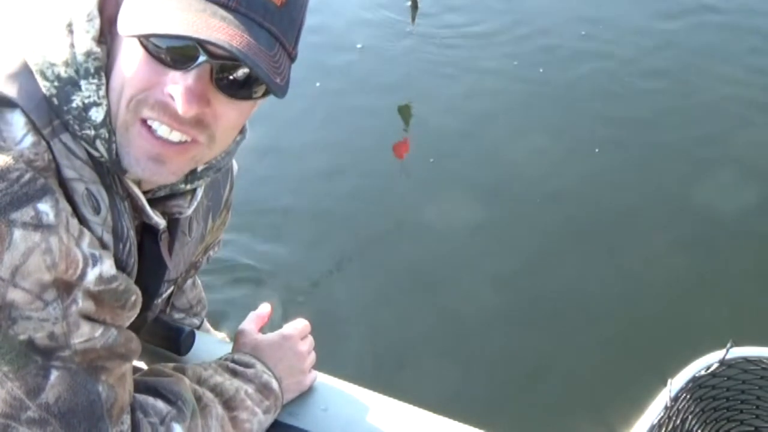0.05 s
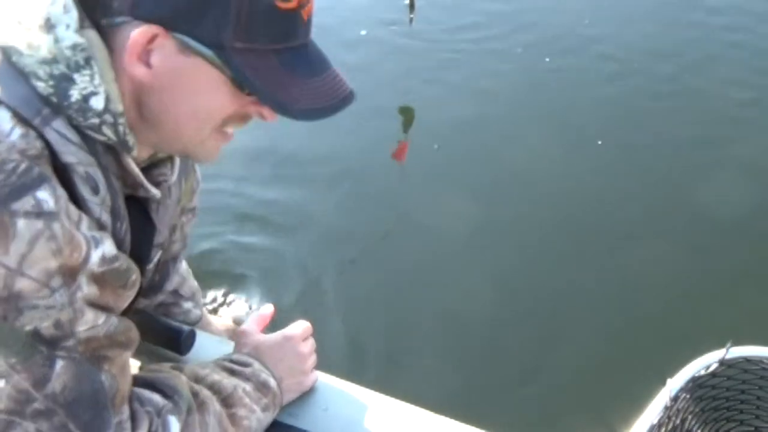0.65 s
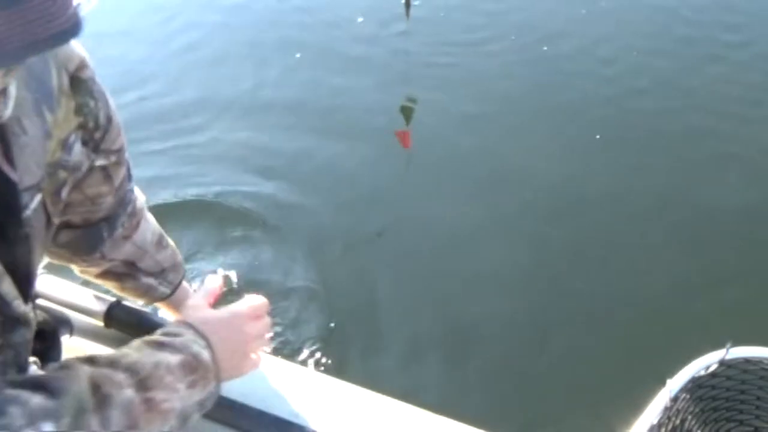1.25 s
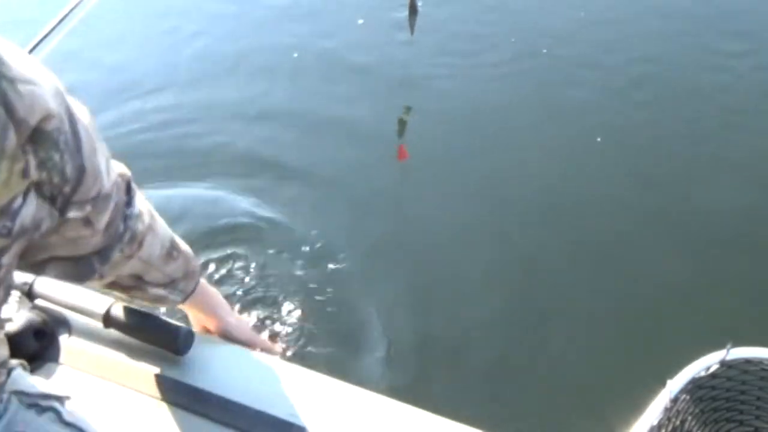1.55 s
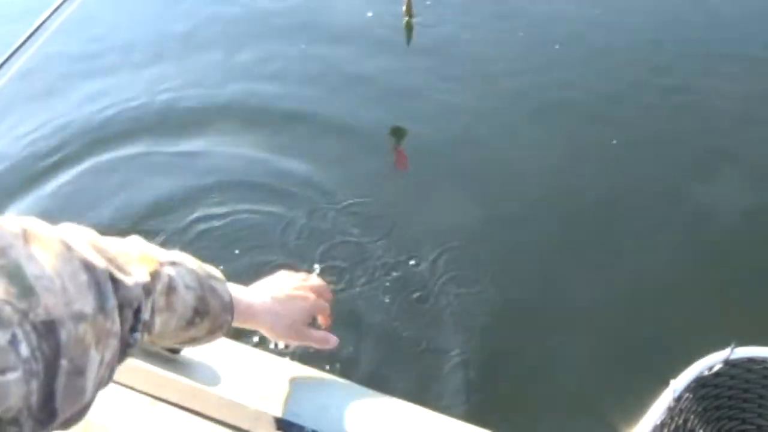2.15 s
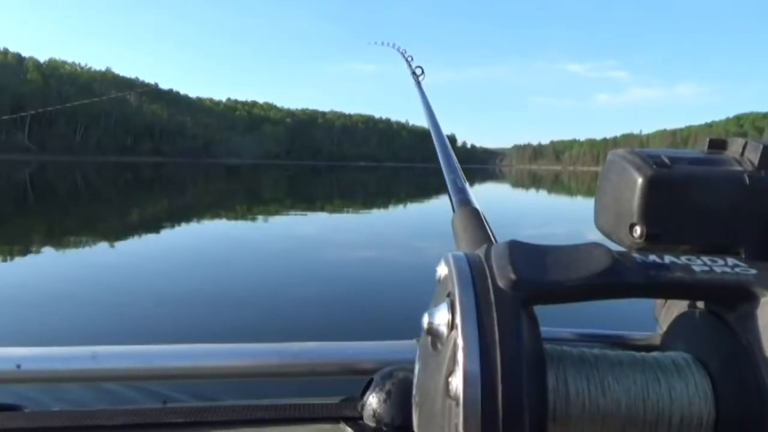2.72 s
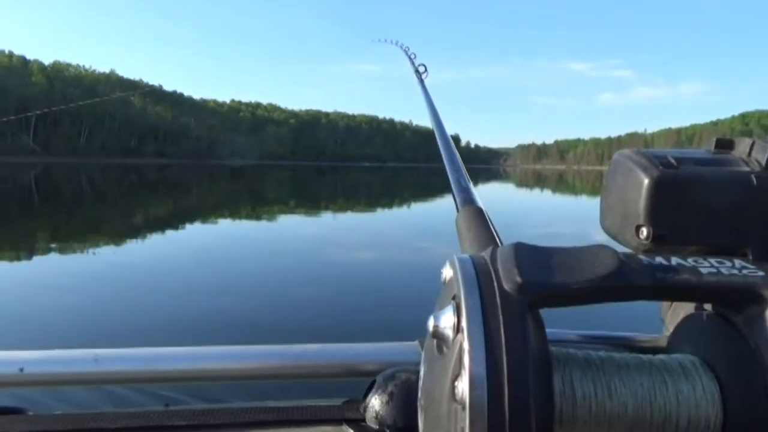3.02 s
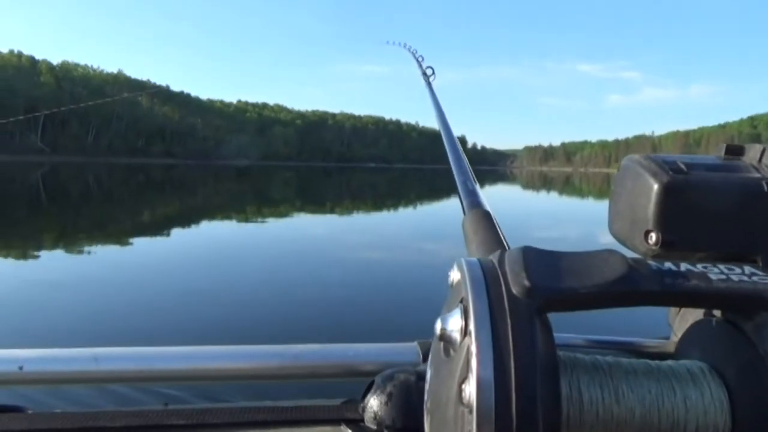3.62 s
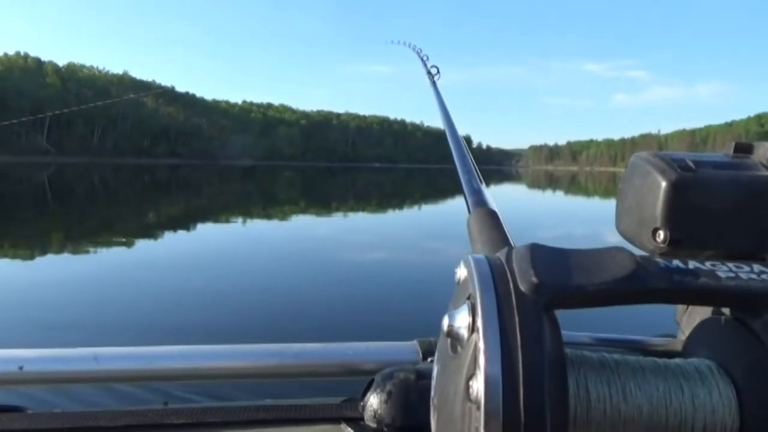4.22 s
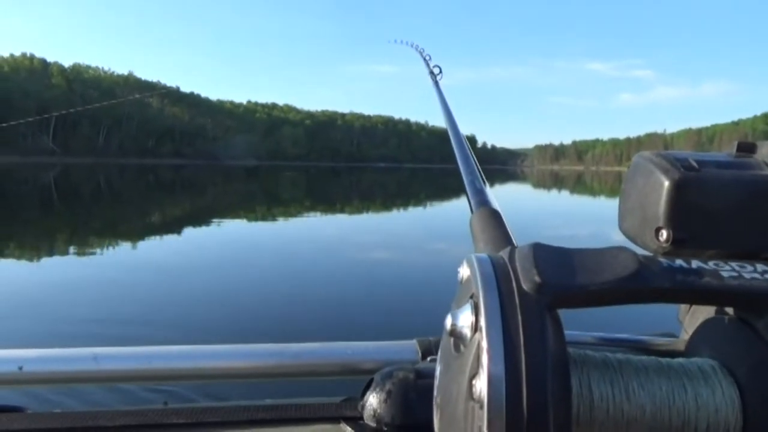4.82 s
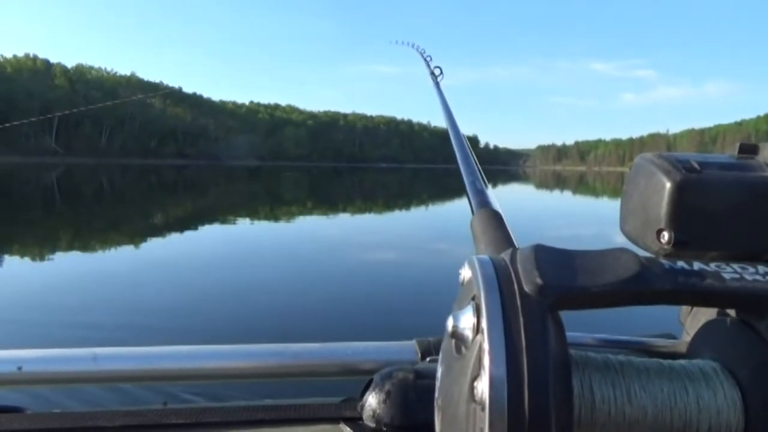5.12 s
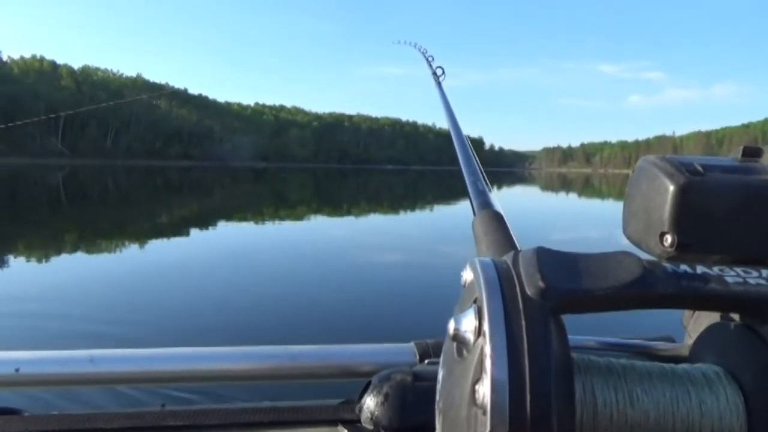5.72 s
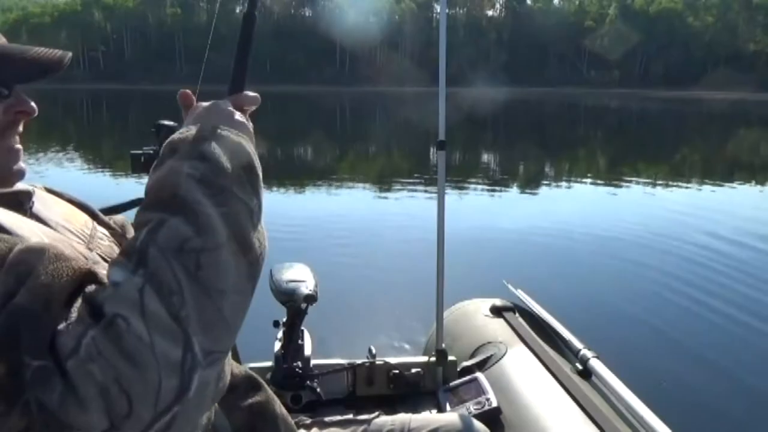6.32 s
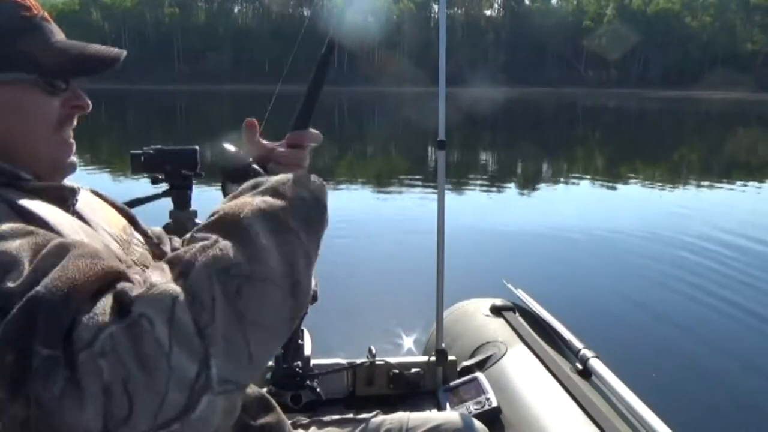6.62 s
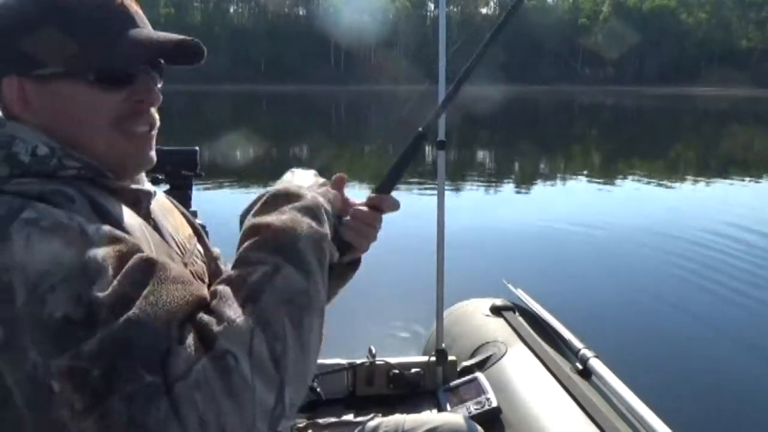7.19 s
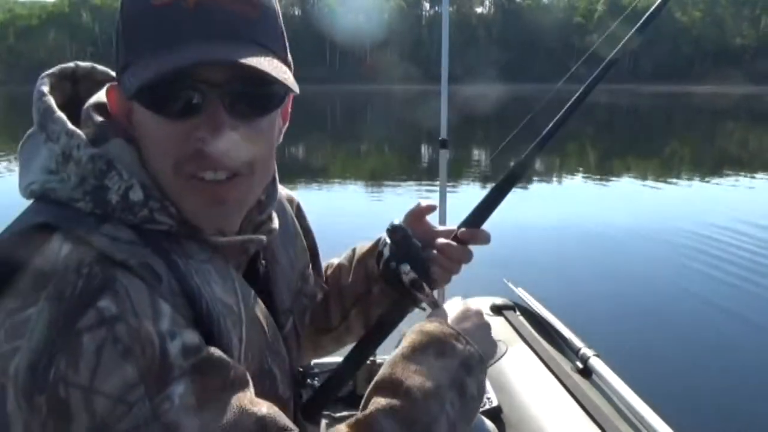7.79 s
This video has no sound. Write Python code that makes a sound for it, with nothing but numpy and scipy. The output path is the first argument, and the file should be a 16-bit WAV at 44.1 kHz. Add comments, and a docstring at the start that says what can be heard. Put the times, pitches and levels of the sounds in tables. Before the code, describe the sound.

On a small boat on a calm lake, a hand plops and splashes in the water, with a rustling jacket and soft bumps on the hull. It turns quiet, leaving a faint trolling motor hum and distant birds. Suddenly a fishing reel's clicker screams right by the microphone, surging as a fish pulls line, then slows to a rattle. Water laps softly under the hull throughout.

```python
"""A fishing reel's clicker, close to the microphone, screams in surges and slows to a rattle as a fish
strips line: a pawl strikes the spool's ratchet teeth and rings the reel. The place is a small boat on a
calm, wooded lake, heard from three spots in turn. At the side, a hand splashes, a jacket rustles and the
hull is bumped. Nearer the trolling motor, its hum lies under distant birds. Last, at the stern, comes
the reel. Water laps under the hull and the open air hisses faintly throughout."""
import sys
import numpy as np
from scipy import signal
from scipy.fft import rfft, irfft, next_fast_len
from scipy.io import wavfile
from scipy.ndimage import map_coordinates

SR = 44100
rng = np.random.default_rng(int(sys.argv[2]) if len(sys.argv) > 2 else 0)


def dump(signal):
    """Clip the signal to [-1, 1] and save it as 16-bit WAV at the path in sys.argv[1]."""
    limited = np.clip(np.atleast_2d(signal).T, -1, 1)
    pcm = np.round(limited * 32767).astype(np.int16)
    wavfile.write(sys.argv[1], SR, pcm)


N = 350595
TIME = np.arange(N) / SR
QUIET_FROM_S, STRIKE_S = 2.392, 6.328   # the stirring ends; the fish takes the line
TEETH_PER_TURN, CRUISE_TEETH_PER_S = 12, 300
SIDE = np.array([[1], [-1]])   # adds on the left, subtracts on the right


# The reel's frame, pawl and spring, close up. Each row: resonance in Hz, width in Hz, relative gain in dB.
FRAME_MODES = [(280, 1270, -16), (1160, 102, -3.5), (1712, 118, 2), (2700, 234, 2.5), (3244, 130, 1),
               (3610, 510, -2)]
PAWL_MODES = [(7000, 780, 22.3), (7600, 360, 9), (5360, 360, 13)]
SPRING_MODES = [(9260, 320, -0.5), (10830, 900, 1), (13750, 580, -1.5), (15100, 820, -9)]

def reel():
    """The clicker, close by: the frame follows the tooth rate cleanly, the small steel parts chatter."""
    teeth_per_s, ring_db = spool()
    teeth_per_s = teeth_per_s * (1 + .015 * drift(60) * teeth_per_s / CRUISE_TEETH_PER_S)
    passed = np.cumsum(teeth_per_s) / SR
    turns = (passed - passed[-1] + .15) / TEETH_PER_TURN   # wheel angle, about zero at the end
    blows = pawl_blows(teeth_per_s, turns) * (TIME >= STRIKE_S)
    on_frame = rattle(blows, teeth_per_s, chatter=.4, chatter_t60=.011, scatter_db=-10, hiss_db=-11)
    on_pawl = rattle(blows, teeth_per_s, chatter=1.5, chatter_t60=.010, scatter_db=-8, hiss_db=0)
    on_spring = rattle(blows, teeth_per_s, chatter=2, chatter_t60=.007, scatter_db=-7, hiss_db=3)
    frame_db = run_level(teeth_per_s, cruise_db=-25.5, db_per_doubling=2.56, db_per_s=-.1)
    pawl_db = run_level(teeth_per_s, cruise_db=-18.5, db_per_doubling=1.84, db_per_s=-.23)
    spring_db = run_level(teeth_per_s, cruise_db=-23.5, db_per_doubling=1.33, db_per_s=2.06)
    frame_db += 1.5 * drift(25) - .18 * ring_db   # the frame gives way as the pawl rings harder
    frame = reel_part(off_centre_ring(on_frame, FRAME_MODES, turns, swing=.012, rock_db=4.5), frame_db)
    pawl = reel_part(off_centre_ring(on_pawl, PAWL_MODES, turns, swing=.022, rock_db=1), pawl_db + ring_db)
    sizzle = reel_part(resonate(on_spring, SPRING_MODES), spring_db + 1.3 * drift(30))
    clicker = frame + pawl + sizzle
    # the two microphone ports differ most around one treble resonance
    treble = resonate(clicker, [(8700, 1560, -14.5)])
    return clicker + np.roll(treble, 1) * SIDE


# The fish's steady draw on the spool. Each row: time in seconds, ratchet teeth per second.
SPOOL_DRAW = [(6.329, 196), (6.38, 175), (6.54, 288), (6.87, 358), (7.1, 302), (7.49, 245), (7.66, 100),
              (7.85, 63), (7.95, 56)]
# Its tugs. Each row: middle and length in seconds, extra teeth per second, extra pawl ring in dB.
FISH_TUGS = [(6.328, 0.1, 68.5, 2.5), (6.478, 0.14, 132, 3), (6.611, .1, 144, 3), (6.779, 0.2, 154, 3),
             (6.98, 0.19, 157, 3.5), (7.165, 0.11, 106, 2.5), (7.259, .13, 84, 3.5),
             (7.419, .114, 116, 1.5), (7.577, .145, 142, 4), (7.759, .15, 31, 3), (7.901, .08, 14.5, 3)]

def spool():
    """Tooth rate and extra pawl ring in dB: every tug is a half-sine swell on top of the draw."""
    s, draw = np.transpose(SPOOL_DRAW)
    teeth_per_s, ring_db = np.exp(np.interp(TIME, s, np.log(draw))), 0
    for middle, length, extra, db in FISH_TUGS:
        swell = np.cos(np.pi * np.clip((TIME - middle) / length, -.5, .5))
        teeth_per_s += extra * swell
        ring_db += db * swell
    return teeth_per_s, ring_db


def pawl_blows(teeth_per_s, turns, jitter_s=.00003, uneven_db=.9, wobble_db=-.96, wobble_teeth=.06):
    """One blow each time the pawl drops off a tooth; the blows flutter once a turn."""
    wobble = np.sin(2 * np.pi * turns)
    drops = np.flatnonzero(np.diff(np.ceil(turns * TEETH_PER_TURN + wobble_teeth * wobble)))
    late, hard = rng.standard_normal((len(drops), 2)).T
    strength = from_db(uneven_db * hard + wobble_db * wobble[drops]) * np.sqrt(SR / teeth_per_s[drops])
    blows = np.zeros(N)
    blows[np.clip(drops + (late * jitter_s * SR).astype(int), 0, N - 1)] = strength
    return blows


def rattle(blows, teeth_per_s, chatter, chatter_t60, scatter_db, hiss_db):
    """Each blow with the brief chatter after it, and a hiss that grows as the spool speeds up."""
    t = TIME[:SR // 25]
    bounce = (dying(t, chatter_t60) - dying(t, chatter_t60 / 4)) ** 2
    scatter = dying(t, .045) ** 2
    after_blow = chatter ** 2 * bounce / bounce.sum() + from_db(scatter_db) ** 2 * scatter / scatter.sum()
    power = signal.fftconvolve(blows ** 2, after_blow)[:N]
    hiss = from_db(hiss_db) * teeth_per_s / teeth_per_s.max() * (TIME >= STRIKE_S)
    return blows + np.sqrt(np.abs(power) + hiss ** 2) * rng.standard_normal(N)


def off_centre_ring(force, modes, turns, swing, rock_db, sectors=4):
    """The wheel runs off centre: once a turn the resonances swing in pitch and swell one after another."""
    sector, out = np.floor(turns * sectors) % sectors, 0
    for k in range(sectors):
        angle = 2 * np.pi * k / sectors
        shifted = [(hz * (1 + swing * np.sin(angle)), width, db + rock_db * np.cos(angle + 2 * j))
                   for j, (hz, width, db) in enumerate(modes)]
        out += resonate(force * (sector == k), shifted)
    return out


def run_level(teeth_per_s, cruise_db, db_per_doubling, db_per_s):
    """Level in dB of a reel part: louder with speed, and changing slowly as the run goes on."""
    doublings = np.log2(teeth_per_s / CRUISE_TEETH_PER_S)
    return cruise_db + db_per_doubling * doublings + db_per_s * np.maximum(TIME - STRIKE_S, 0)


# Reflection off the boat, just behind the direct sound. Each row: delay in seconds, gain in dB.
BOAT_REFLECTIONS = [(.0074, -17)]

def reel_part(sound, level_db):
    """A ringing part reaches the microphone directly and off the boat, together at the given level."""
    for delay, db in BOAT_REFLECTIONS:
        sound = sound + from_db(db) * np.pad(sound, (int(delay * SR), 0))[:N]
    return from_db(level_db) * sound / np.std(sound[TIME > STRIKE_S])


# The rod being handled, close by. Each row: start in seconds, level in dB, centre in Hz.
ROD_KNOCKS = [(6.694, -28, 260), (7.02, -19, 480), (7.165, -28, 280)]

def rod_knocks(t60=.099):
    """The rod butt knocks against clothing and its holder: short, noisy thuds."""
    out, t = np.zeros(N), TIME[:SR // 8]
    for s, db, hz in ROD_KNOCKS:
        push = rng.standard_normal(len(t)) * (dying(t, t60) - dying(t, t60 / 4))
        thud = resonate(resonate(push, [(hz, hz, 0)]), [(hz, 1.2 * hz, 0)])
        add(out, s, from_db(db) * thud / np.abs(thud).max())
    return out


# A hand in the water, just over the side. Each row: start in seconds, level in dB, main bubble in Hz.
HAND_PLOPS = [(0.636, -27, 850), (0.657, -28, 985), (0.989, -16, 1073), (0.994, -23, 1116),
              (1.014, -25.5, 747), (1.031, -25, 2370), (1.04, -27.5, 950), (1.079, -28.5, 623),
              (1.094, -27.5, 970), (1.152, -30.5, 520), (1.287, -24, 660)]

def splashes():
    """Each plop is a slap, one main bubble and three weaker ones scattered after it."""
    slaps, bubbles, t = np.zeros(N), np.zeros(N), TIME[:SR // 10]
    slap_shape = dying(t, .038) - dying(t, .0053)
    for s, db, hz in HAND_PLOPS:
        add(slaps, s, from_db(db - 6) * rng.standard_normal(len(t)) * slap_shape)
        add(bubbles, s, from_db(db - 5) * bubble(hz, cycles=58, rise=.16))
        for late, high, weak in rng.random((3, 3)):
            stray = bubble(650 * 5.6 ** high, cycles=34, rise=.098)
            add(bubbles, s + .034 * late, from_db(db - 3 - 22 * weak) * stray)
    return bubbles + resonate(slaps, [(1040, 360, 12.7), (2120, 1100, 10.3)])


def spray(droplets=9, mean_fall_s=.032):
    """Droplets patter back after each plop, as tiny high bubbles."""
    out = np.zeros(N)
    for s, db, _ in HAND_PLOPS:
        for late, high, weak in rng.random((droplets, 3)):
            droplet = bubble(4000 * 3.2 ** high, cycles=29, rise=.087)
            add(out, s - mean_fall_s * np.log(1 - late), from_db(db - 12 - 10 * weak) * droplet)
    return out


def bubble(hz, cycles, rise):
    """A trapped bubble rings and rises in pitch as it nears the surface."""
    t60 = cycles / hz
    t = TIME[:int(t60 * SR) + 2]
    return np.sin(2 * np.pi * hz * t * (1 + rise * t / t60)) * dying(t, t60)


# Spray and gear near the microphone. Each row: start in seconds, level in dB, centre in Hz.
SHARP_TICKS = [(0.6728, -26, 6600), (0.694, -22.5, 4700), (0.711, -25, 10400), (0.9084, -29, 6250),
               (0.941, -29, 9600), (1.038, -29.5, 6650), (1.267, -32, 6400), (1.4433, -20.5, 5460),
               (1.4727, -17.5, 6440), (1.929, -27.5, 6290), (2.0683, -27, 5250)]

def ticks():
    """Spray and gear tick in short, bright snaps of noise."""
    out, t = np.zeros(N), TIME[:SR // 25]
    for s, db, hz in SHARP_TICKS:
        burst = rng.standard_normal(len(t)) * dying(t, .031)
        snap = resonate(burst, [(hz, 1500, 0), (11000, 6000, -7)])
        add(out, s, from_db(db - 2) * snap / np.abs(snap).max())
    return out


# Movement at the side of the boat. Each row: time in seconds, water level in dB, jacket level in dB.
STIR_LEVELS = [(0.0, -56.5, -65.5), (1.01, -49.5, -60.5), (1.21, -45, -56.5), (2.24, -47.5, -57),
               (2.38, -50.5, -57)]
# The wash and the jacket at close range. Each row: frequency in Hz, relative level in dB.
WASH_SPECTRUM = [(200, -2.5), (400, -3.5), (720, -2.5), (1300, -6.5), (2550, -5), (3300, -18), (6000, -16)]
JACKET_SPECTRUM = [(2200, -4), (3000, 0), (4200, -2), (6800, 2.5), (8900, -2), (16000, -6.5)]

def stirring():
    """The wash of stirred water and the grainy rustle of a jacket."""
    water_db, jacket_db = in_time(STIR_LEVELS)
    water = from_db(water_db - 1 + 1.04 * drift(90)) * noise(WASH_SPECTRUM)
    jacket = from_db(jacket_db + 6 + 1.5 * drift(250)) * noise(JACKET_SPECTRUM)
    return (water + jacket) * (TIME < QUIET_FROM_S)


def slosh(bubbles_per_s=70):
    """Stirred water traps small bubbles at random, louder as it is stirred harder."""
    out = np.zeros(N)
    times, water_db, _ = np.transpose(STIR_LEVELS)
    for when, high, weight in rng.random((int(bubbles_per_s * QUIET_FROM_S), 3)):
        s = when * QUIET_FROM_S
        db = np.interp(s, times, water_db) + 2 + 10 * weight ** 3
        add(out, s, from_db(db) * bubble(450 * 6 ** high, cycles=14, rise=.081))
    return out


# Soft bumps on the hull, heard from aboard. Each row: start in seconds, level in dB, centre in Hz.
HULL_BUMPS = [(0.339, -31, 285), (0.613, -29.5, 105), (0.649, -31, 136), (0.692, -36, 112),
              (0.769, -39, 117), (1.144, -28.5, 285), (1.623, -27, 118), (1.654, -29.5, 91.5),
              (1.86, -35, 267), (2.16, -30.5, 354), (2.189, -28.5, 267.6)]
# The hull's modes. Each row: frequency in Hz, relative level in dB.
HULL_MODES = [(88, 9.5), (112, 6.5), (146, 5.5), (185, 4), (238, 1.5), (290, 6), (365, 1.5), (470, -2.5),
              (610, -3.5), (760, 2.5)]

def hull_bumps():
    """Every bump rings the hull modes, most of all those near its own centre."""
    out, t = np.zeros(N), TIME[:SR // 4]
    hz, mode_db = np.transpose(HULL_MODES)
    for s, db, centre_hz in HULL_BUMPS:
        uneven, polarity = rng.standard_normal((2, len(hz)))
        octaves_off = np.abs(np.log2(hz / centre_hz))
        gains = from_db(mode_db + 4.2 * uneven - 7.3 * octaves_off) * np.sign(polarity)
        thud = gains @ np.sin(2 * np.pi * np.outer(hz, t)) * dying(t, .098) * (1 - dying(t, .011))
        add(out, s, from_db(db + 1.5) * thud / np.abs(thud).max())
    return out


# Water working under the hull. Each row: time in seconds, rumble level in dB, gurgle level in dB.
LAPPING_LEVELS = [(0.0, -68.5, -54.5), (0.91, -50, -66), (1.22, -61, -55), (1.66, -51, -44),
                  (2.57, -61, -58), (6.2, -67, -55), (6.75, -58, -49.5), (7.55, -61, -52),
                  (7.95, -43.5, -52)]
# Its rumble and gurgle, heard from aboard. Each row: frequency in Hz, relative level in dB.
RUMBLE_SPECTRUM = [(20, 4), (45, -7.5), (64, -20), (85, 9.5), (115, 12.5), (150, -4.5), (220, -23)]
GURGLE_SPECTRUM = [(130, -11), (190, 2.5), (255, -3.5), (350, -3), (460, -16.5), (700, -23.5)]

def lapping():
    """Low, lumpy water noise under the hull, a little different on each side."""
    rumble_db, gurgle_db = in_time(LAPPING_LEVELS)
    lumps_db = 1.5 * drift(14)
    rumble = from_db(rumble_db + 3 + .5 * drift(23)) * wide_noise(RUMBLE_SPECTRUM, width=.095)
    gurgle = from_db(gurgle_db + lumps_db) * wide_noise(GURGLE_SPECTRUM, width=.17)
    return pan(rumble, .4) + pan(gurgle, 5.9)


# The trolling motor's hum from nearby. Each row: multiple of the rotation rate, level in dB.
HUM_ORDERS = [(.5, -70), (1, -59.5), (2, -55.5), (3, -61)]
# Its gear whine, left of the microphone. Each row: frequency in Hz, level in dB.
GEAR_WHINE = [(772, -80.5), (900, -85.5), (1029, -77.5), (1158, -73), (1543, -88)]
# Its housing. Each row: resonance in Hz, width in Hz, relative gain in dB.
HOUSING_MODES = [(938, 220, -1), (1190, 107, 2), (1536, 85, -2)]

def motor(rotation_hz=88.9, away_db=-8):
    """The turning motor hums steadily, with a faint gear whine and a whirr from the housing."""
    clock = TIME + np.cumsum(.003135 * drift(5)) / SR   # the speed wanders slightly

    def tone(hz, db, waver_db):
        return np.sqrt(2) * from_db(db + waver_db * drift(7)) * np.sin(2 * np.pi * hz * clock)

    hum = sum(pan(tone(order * rotation_hz, db, 1.34), 6 if order > 1 else 0) for order, db in HUM_ORDERS)
    whine = sum(tone(hz, db, 3) for hz, db in GEAR_WHINE)
    housing = resonate(resonate(rng.standard_normal(N), HOUSING_MODES), HOUSING_MODES)
    whirr = from_db(-64) * rms_one(housing)
    away = (TIME < QUIET_FROM_S) | (TIME > STRIKE_S)   # microphone at the side or the stern
    return hum * from_db(away_db * away) + pan(whine + whirr, 5.2)


# Birds across the water. Each row: start and length in seconds, level in dB, first and last pitch in Hz,
# warble as a share of the pitch.
BIRD_NOTES = [(.15, 0.12, -50, 4900, 4650, 0.16), (.317, 0.11, -49.5, 4250, 4280, 0.13),
              (.477, .045, -49, 3150, 2500, 0), (.525, 0.082, -41, 2850, 3395, .07),
              (.6, .04, -49, 3600, 2510, 0.018), (2.49, 0.16, -66.5, 3180, 2480, 0),
              (2.627, 0.091, -64, 4260, 4730, 0.0066), (2.924, .1, -63.5, 2800, 2620, 0.012),
              (3.272, 0.38, -65, 3290, 3250, 0.012), (3.982, .09, -65.5, 3060, 2480, 0.032),
              (4.33, 0.16, -66, 2940, 2480, 0.0093), (4.44, 0.21, -66, 4160, 4200, 0.0023)]

def birds():
    """Whistled notes, a trill and a far chorus, echoing from the wooded shore."""
    song = np.zeros(N)
    for s, length, db, start_hz, end_hz, warble in BIRD_NOTES:
        add(song, s, from_db(db) * bird_note(length, start_hz, end_hz, warble))
    add(song, 3.04, long_whistle())
    song *= from_db(3.3 * drift(70))   # the level flickers
    far = trill() + chorus()
    # the trees blur the far singers most
    woods = .6 * tail(far, t60=.06) + tail(.8 * far + .4 * song, t60=1)
    return pan(song + woods, 2.2)


def bird_note(length, start_hz, end_hz, warble=0, warble_hz=19.3):
    """One whistled glide with a warble on it."""
    t = TIME[:int(length * SR)]
    hz = np.linspace(start_hz, end_hz, len(t)) * (1 - warble * np.cos(2 * np.pi * warble_hz * t))
    return np.sqrt(2) * signal.windows.tukey(len(t), .4) * np.sin(2 * np.pi * np.cumsum(hz) / SR)


def long_whistle(length_s=.39, top_hz=6230, end_hz=4100, fall_s=.056, fade_s=.13, edge_s=.0091):
    """A bird's whistle with two faint overtones falls quickly; a faint sound of its low note lingers after it."""
    t = TIME[:int(length_s * SR)]
    hz = end_hz + (top_hz - end_hz) * np.exp(-t / fall_s)
    phase = 2 * np.pi * np.cumsum(hz) / SR
    edges = np.minimum(np.minimum(t, t[::-1]) / edge_s, 1)
    level = from_db(-45.5) * edges * (np.exp(-(t / fade_s) ** 2) + from_db(-15))
    tone = np.sin(phase) + from_db(-23) * np.sin(2 * phase) + from_db(-27) * np.sin(3 * phase)
    return np.sqrt(2) * level * tone


# A dry trill, far off on the shore. Each row: time in seconds, level in dB.
TRILL_LEVELS = [(3.3, -78), (3.7, -62), (5.4, -54.5), (6.3, -59)]

def trill(start_s=3.263, notes_per_s=9.8):
    """A bird repeats one quick downward sweep, with an equal rest after each."""
    progress = np.minimum((TIME - start_s) * notes_per_s % 1 / .5, 1)
    hz = 7600 - 2900 * progress
    level = from_db(in_time(TRILL_LEVELS)[0]) * np.sin(np.pi * progress) * (TIME > start_s)
    return level * np.sin(2 * np.pi * np.cumsum(hz) / SR)


# Bouts of song, far off in the trees. Each row: start and end in seconds, level in dB.
CHORUS_BOUTS = [(2.703, 3.699, -58.5), (3.85, 4.599, -61), (4.702, 5.75, -70.5), (5.798, 6.251, -64.5)]

def chorus(notes=13):
    """In each bout far birds slur a run of short falling notes."""
    song = np.zeros(N)
    for start, end, db in CHORUS_BOUTS:
        for k, (when, high, slur, length, weak) in enumerate(rng.random((notes, 5))):
            s = start + (end - start) * (k + when) / notes
            end_hz = 2250 * 1.9 ** high
            note = bird_note(.02437 + .03495 * length, end_hz * (1.05 + .71 * slur), end_hz)
            add(song, s, from_db(db - 3 * weak) * note)
    return song


# Open air all round the boat. Each row: frequency in Hz, relative level in dB.
AIR_SPECTRUM = [(450, -11.5), (800, -8), (1900, -13.5), (2700, -7), (4000, -10.5), (6200, -7.5),
                (8600, -13.5), (16000, -19)]

def air():
    """Faint hiss of the open lake."""
    return from_db(-60) * wide_noise(AIR_SPECTRUM, width=.1)


def from_db(db):
    """Decibels to gain."""
    return 10 ** (np.asarray(db) / 20)


def rms_one(x):
    """Scale to unit rms."""
    return x / np.sqrt(np.mean(x ** 2) + 1e-20)


def in_time(rows):
    """Each column of a curve at every sample."""
    s, *columns = np.transpose(rows)
    return [np.interp(TIME, s, column) for column in columns]


def add(out, s, sound):
    """Mix a short sound in at s seconds."""
    at = int(np.clip(round(s * SR), 0, N - 1))
    out[at:at + len(sound)] += sound[:N - at]


def drift(knots_per_s):
    """A random wander of unit rms."""
    knots = rng.standard_normal(4000)
    return rms_one(map_coordinates(knots, [TIME * knots_per_s], order=1, mode="wrap"))


def noise(spectrum):
    """Unit-rms noise shaped by rows of (Hz, dB)."""
    hz, db = np.transpose(spectrum)
    size = next_fast_len(N, True)
    log_hz = np.log(np.fft.rfftfreq(size, 1 / SR) + 1)
    gain = from_db(np.interp(log_hz, np.log(hz), db, left=-90, right=-90))
    return rms_one(irfft(rfft(rng.standard_normal(size)) * gain, size)[:N])


def wide_noise(spectrum, width):
    """Stereo noise: a shared middle plus an independent side signal."""
    return noise(spectrum) + width * noise(spectrum) * SIDE


def resonate(x, modes):
    """Parallel resonances (Hz, width in Hz, dB) of alternating sign."""
    out = 0
    for k, (hz, width, db) in enumerate(modes):
        r = np.exp(-np.pi * width / SR)
        poles = [1, -2 * r * np.cos(2 * np.pi * hz / SR), r * r]
        out += (-1) ** k * from_db(db) * (1 - r * r) / 2 * signal.lfilter([1, 0, -1], poles, x + 1e-18)
    return out


def dying(t, t60):
    """Exponential decay of 60 dB in t60 seconds."""
    return np.exp(-np.log(1000) * t / t60)


def tail(x, t60):
    """Diffuse echo: x through a dying noise burst of unit energy."""
    t = TIME[:int(t60 * SR) + 2]
    response = rng.standard_normal(len(t)) * dying(t, t60)
    return signal.fftconvolve(x, response / np.linalg.norm(response))[:N]


def pan(x, left_db):
    """Place a sound so that the left channel leads by left_db."""
    return x * from_db([[left_db / 2], [-left_db / 2]])


def scene():
    """Everything that reaches the microphone in the boat, with the handling sounds a little to the left."""
    handling = splashes() + spray() + slosh() + ticks() + stirring() + hull_bumps() + rod_knocks()
    return reel() + pan(handling, 2.5) + lapping() + motor() + birds() + air()


def record(dry):
    """The highest peaks are rounded and the top is cut steeply."""
    ceiling, cutoff_hz = .8, 15750
    rounded = dry / (1 + (dry / ceiling) ** 6) ** (1 / 6)
    return signal.sosfilt(signal.ellip(12, .1, 80, cutoff_hz, fs=SR, output="sos"), rounded)


dry = scene()
out = record(dry)
dump(out)
```